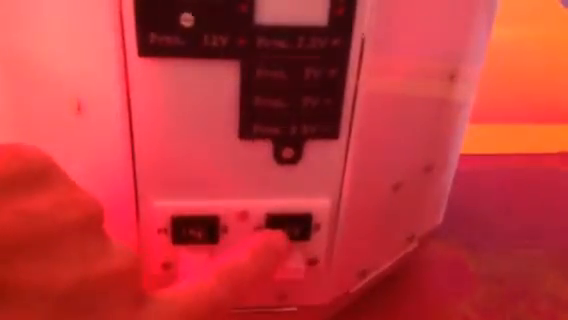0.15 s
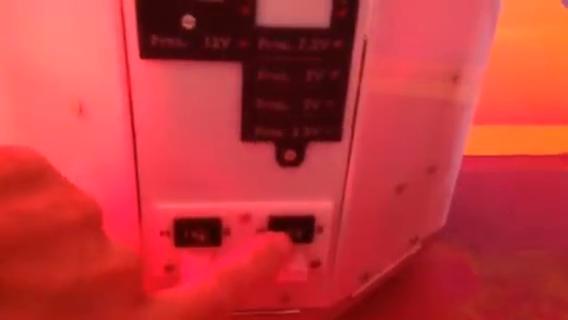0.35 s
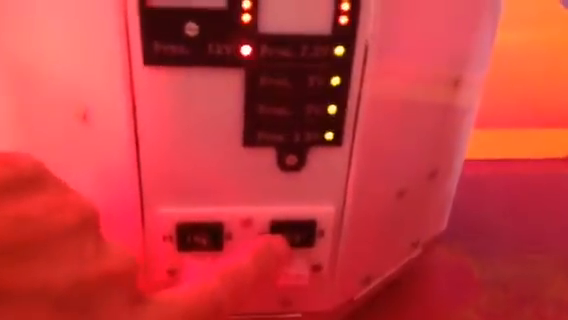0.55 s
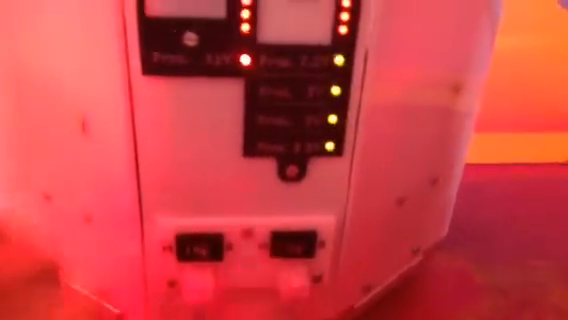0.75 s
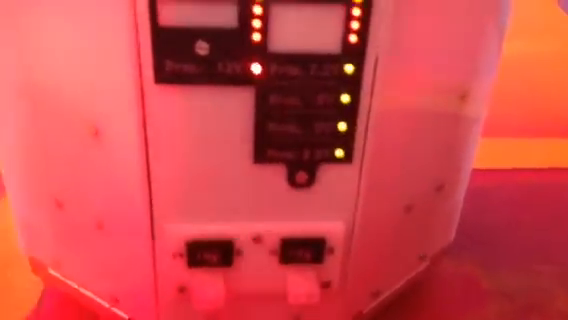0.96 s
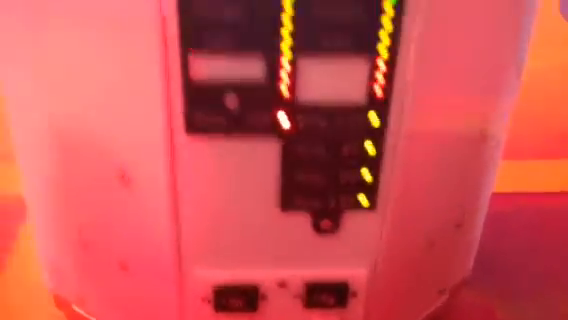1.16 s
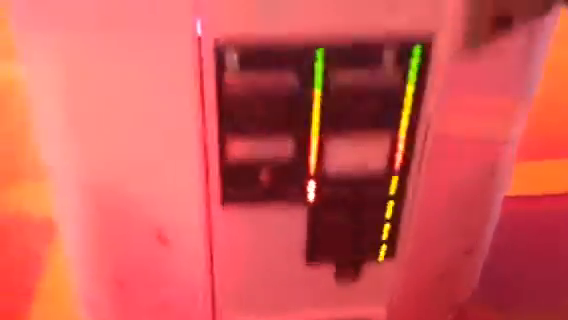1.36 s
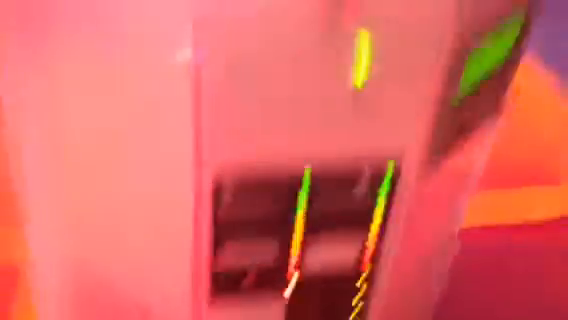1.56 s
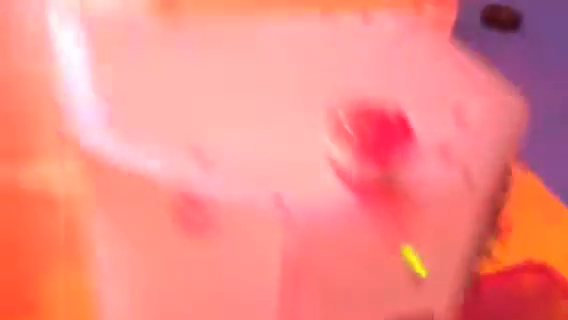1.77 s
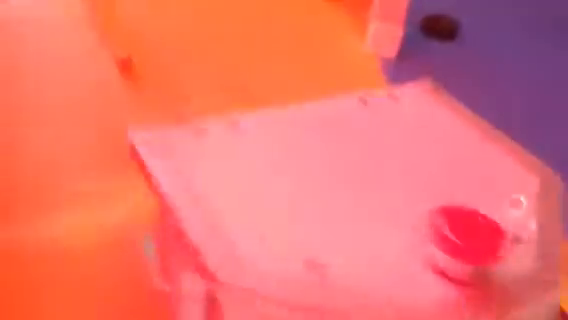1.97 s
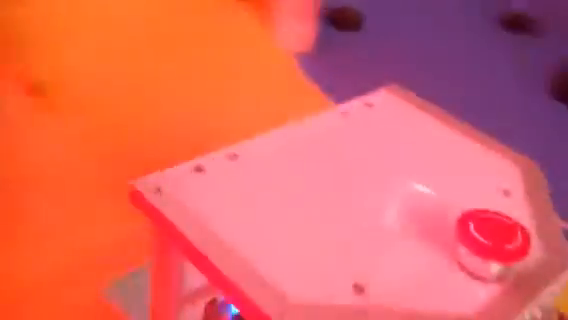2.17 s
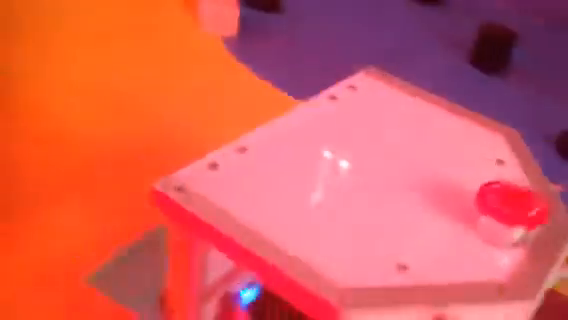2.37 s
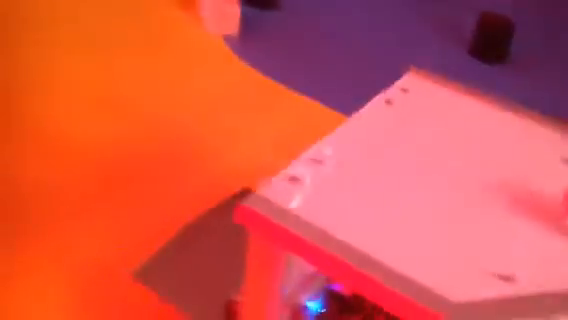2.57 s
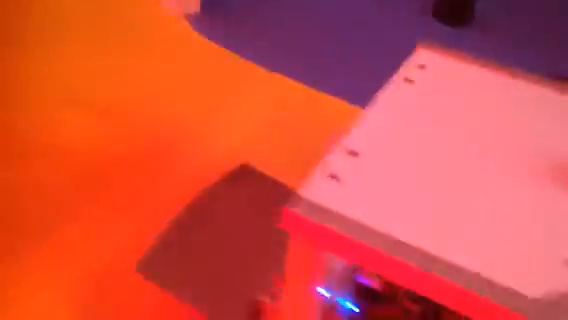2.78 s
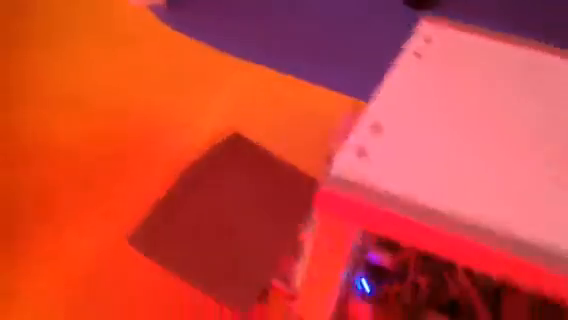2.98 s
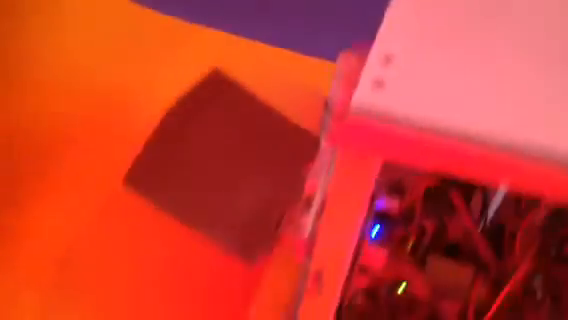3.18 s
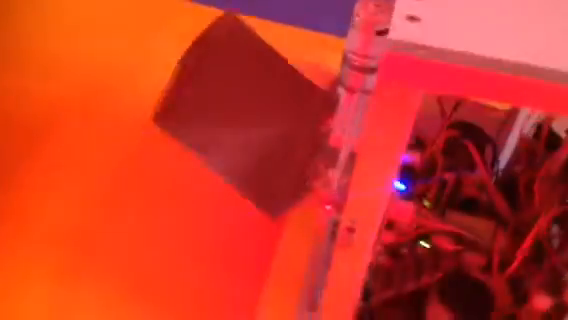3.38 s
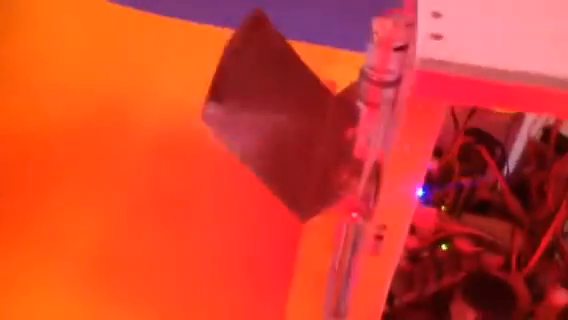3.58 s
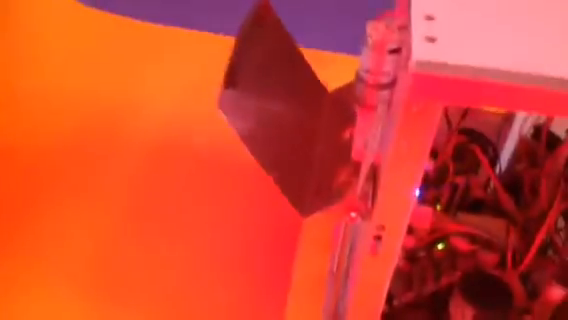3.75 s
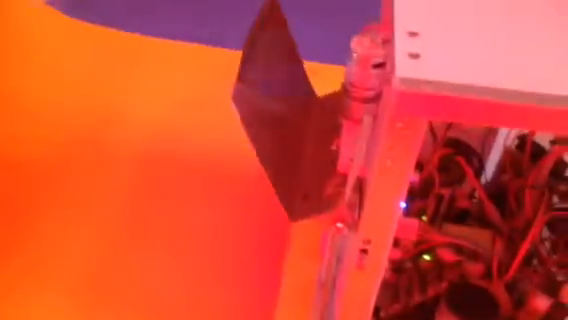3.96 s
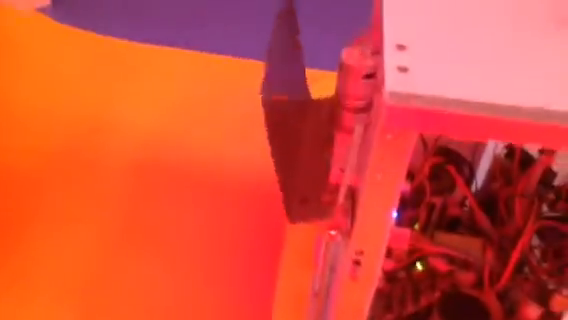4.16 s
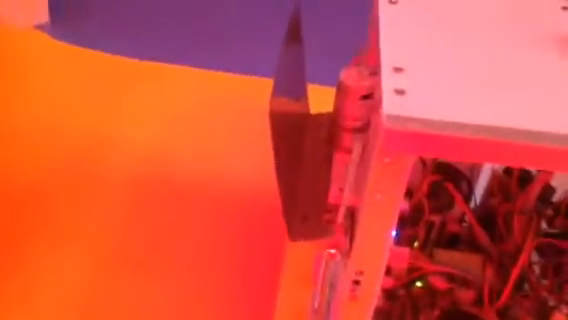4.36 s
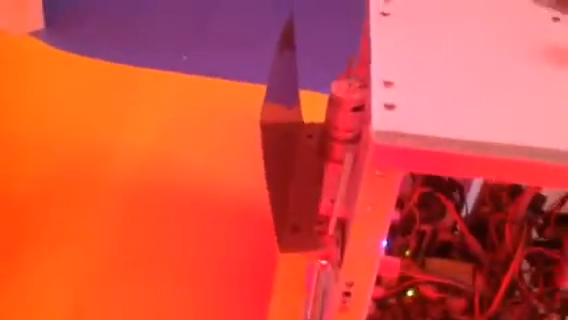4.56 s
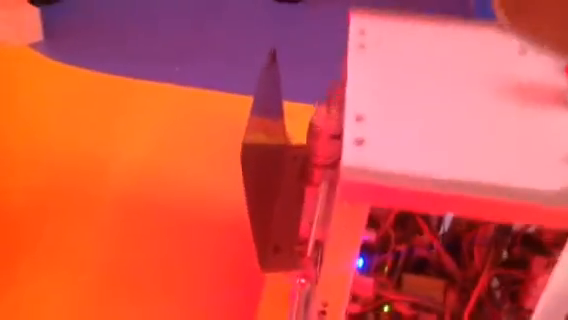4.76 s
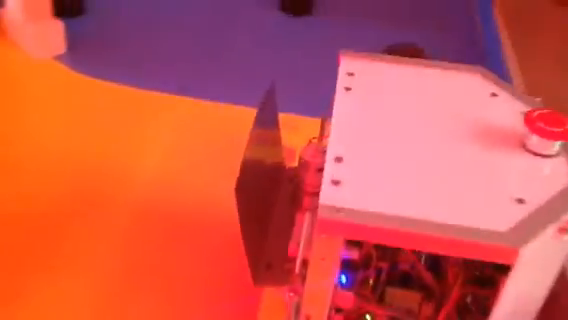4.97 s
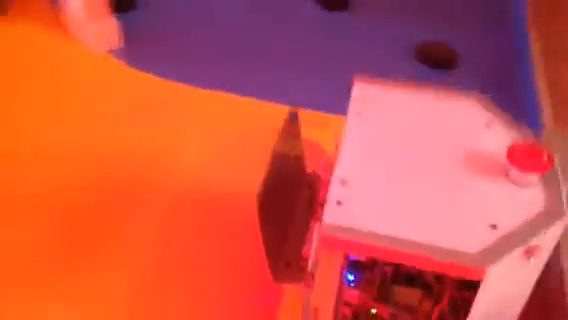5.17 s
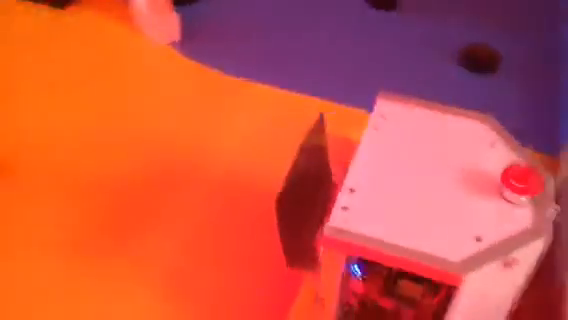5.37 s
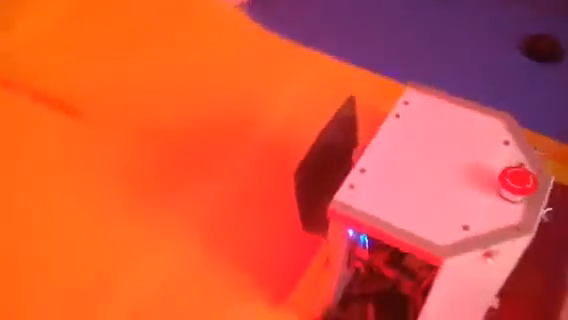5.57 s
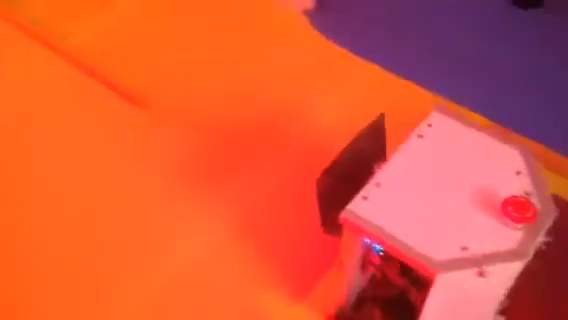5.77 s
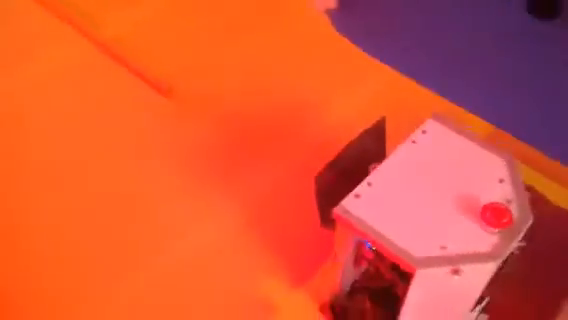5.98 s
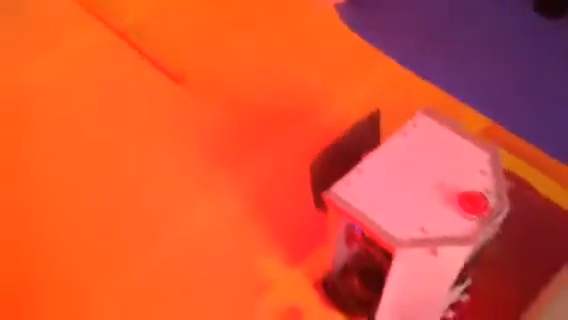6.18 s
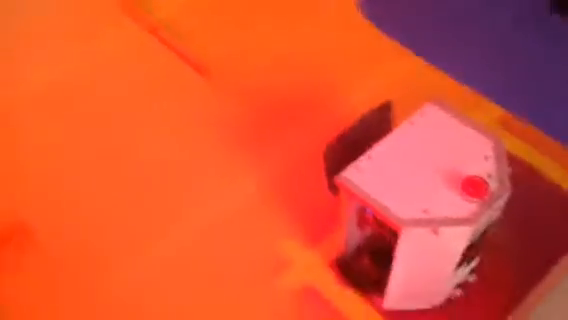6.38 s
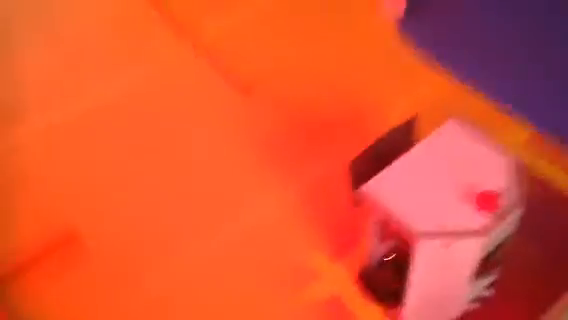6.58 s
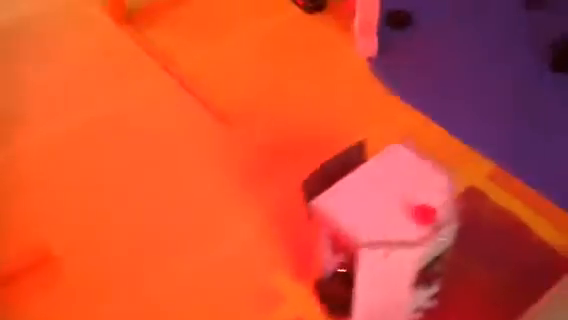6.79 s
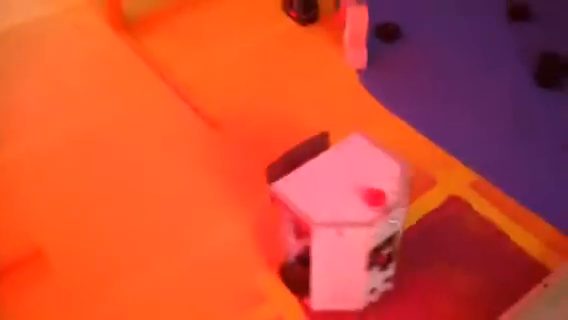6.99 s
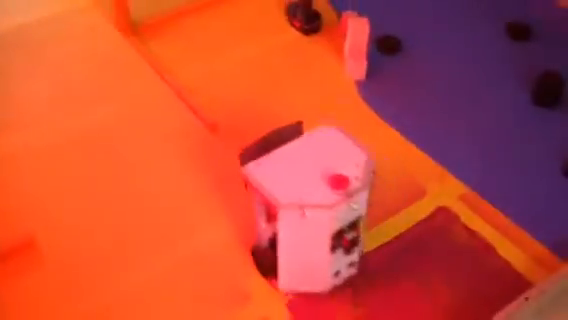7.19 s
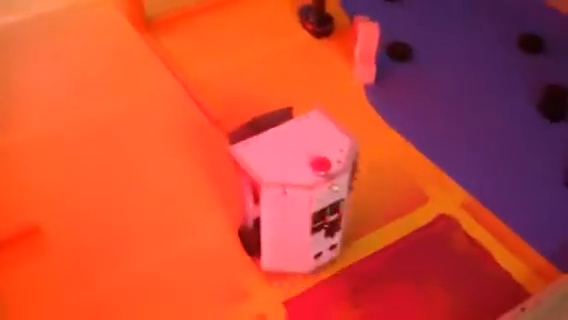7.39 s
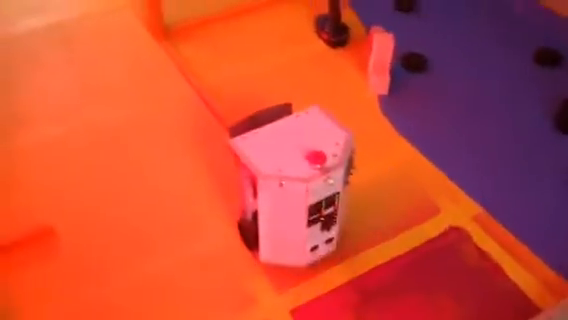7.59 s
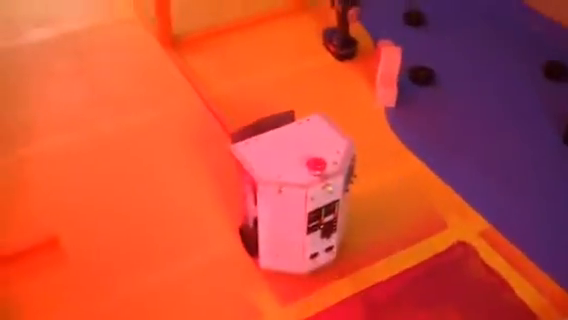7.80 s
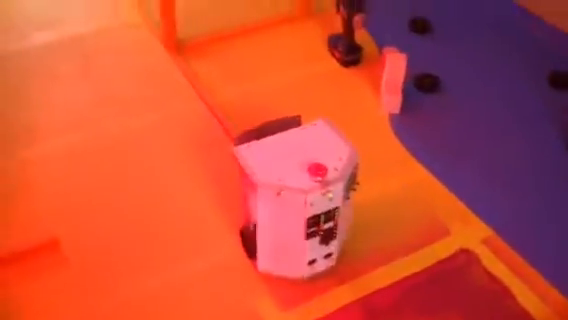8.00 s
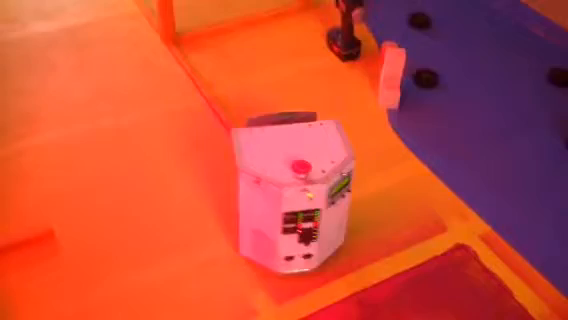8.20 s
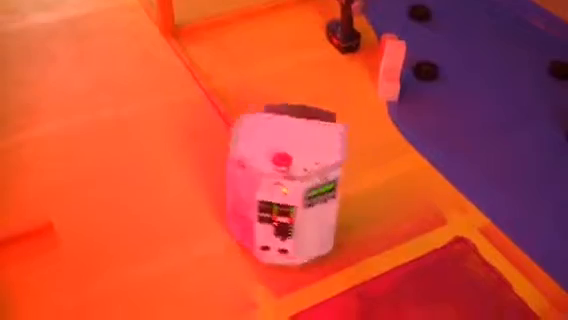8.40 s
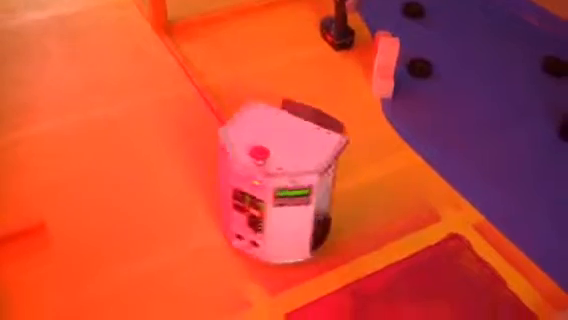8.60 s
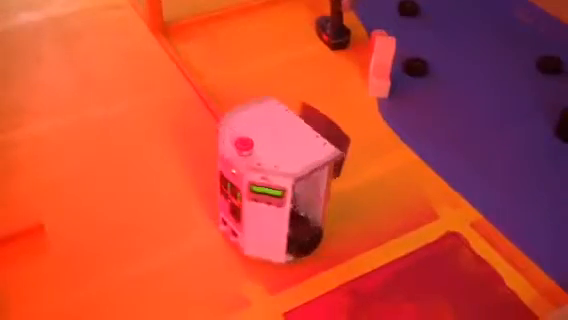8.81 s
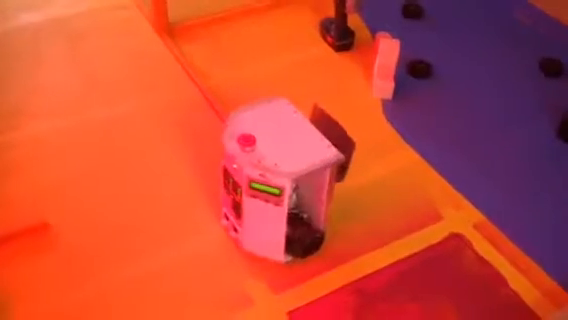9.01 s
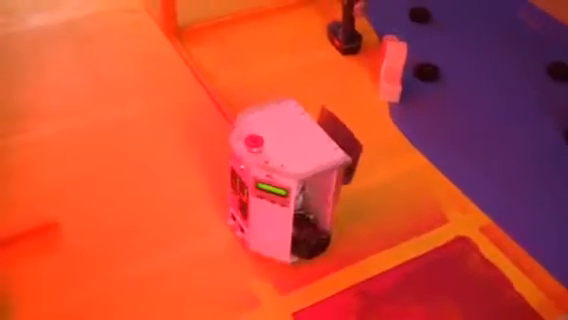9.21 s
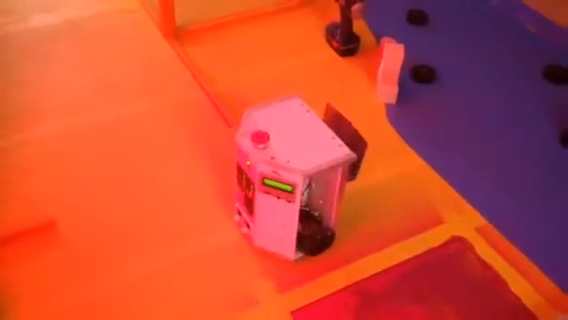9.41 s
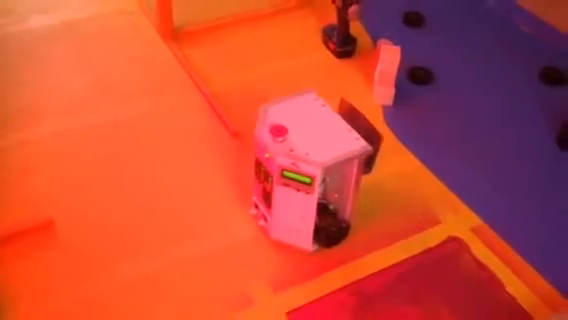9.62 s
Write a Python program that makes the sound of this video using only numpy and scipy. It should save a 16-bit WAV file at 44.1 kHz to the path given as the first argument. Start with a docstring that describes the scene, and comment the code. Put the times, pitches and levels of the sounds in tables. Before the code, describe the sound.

A switch snaps on a small robot, a geared servo whirs and scrapes with throbbing squeals, then wheel motors grind in short rumbling pushes.

```python
"""Faint hiss and one tiny tick, then a switch snaps on a small wheeled robot, close by in a quiet room.
A geared servo whirs while it lifts a flap: scraping noise and jittery tooth tones throb with each turn
of an uneven gear, and single teeth squeal. After a pause with faint shuffling the wheel motors turn the
robot in short pushes: noise and ringing modes rumble through the table under a thin chopper whine."""
import sys
import numpy as np
from scipy import signal
from scipy.fft import rfft, irfft
from scipy.io import wavfile
from scipy.ndimage import uniform_filter1d, map_coordinates

SR = 44100
rng = np.random.default_rng(int(sys.argv[2]) if len(sys.argv) > 2 else 0)


def file_out(sig):
    """Save sig as 16-bit WAV at sys.argv[1]."""
    # one column per channel
    cols = np.atleast_2d(sig).T
    # limit, then scale
    lim = np.clip(cols, -1, 1)
    pcm = np.round(lim * 32767).astype(np.int16)
    wavfile.write(sys.argv[1], SR, pcm)


N = 425565
T = np.arange(N) / SR  # s

# In all tables the levels are relative: later gains and mixing still apply.


def amp(db):
    """Decibels to a linear factor."""
    return 10 ** (np.asarray(db) / 20)


def evened(x):
    """Scales x to an RMS level of 1."""
    return x / np.sqrt(np.mean(x ** 2) + 1e-20)


def read(points, hz):
    """Value of a spectrum table at hz, interpolated along log frequency."""
    f, value = np.transpose(points)
    return np.interp(np.log(hz + 1), np.log(f + 1), value)


def play(rows):
    """A switch that is on between the ends of a curve table, then its columns at every sample."""
    s, *columns = np.transpose(rows)
    inside = 1. * ((T >= s[0]) & (T <= s[-1]))
    on = uniform_filter1d(inside, size=200, mode="nearest")
    return [on] + [np.interp(T, s, c) for c in columns]


def coloured(x, points):
    """Filters x by a spectrum table and evens it to level 1."""
    gain = amp(read(points, np.fft.rfftfreq(N, 1 / SR)))
    return evened(irfft(rfft(x) * gain, N))


def whistle(hz, width, firm=0.0082, locked=0):
    """Noise in a resonance that follows the curve hz; firm (0-1) evens its level into a jittery tone,
    locked adds a part that keeps step with the curve's own cycles."""
    r = np.exp(-np.pi * abs(width) / SR)
    noise = rng.standard_normal(N) + 1j * rng.standard_normal(N)
    slow = signal.lfilter([1], [1, -2 * r, r * r], noise)
    slow = slow / abs(slow) ** np.clip(firm, 0, 1)
    slow = slow / np.sqrt(np.mean(abs(slow) ** 2)) + locked
    carrier = np.exp(2j * np.pi * np.cumsum(hz * np.ones(N)) / SR)
    return evened((slow * carrier).real)


def wander(per_s):
    """Smooth random drift of level 1 with per_s random points a second."""
    knots = rng.standard_normal(4000)
    return evened(map_coordinates(knots, [T * per_s + 2], order=3))


def grit(per_s, spread_db):
    """Sparse clicks of uneven size and random sign, level 1."""
    size = amp(spread_db * np.minimum(rng.exponential(1, N), 5)) * rng.choice([-1, 1], N)
    return evened(size * (rng.random(N) < per_s / SR))


def patchy(x, db, bins, frames):
    """Random patches of pitch and time stand out, as parts chatter each on their own."""
    z = signal.stft(x, nperseg=512)[2]
    field = uniform_filter1d(rng.standard_normal(z.shape), bins, 0)
    field = uniform_filter1d(field, frames, 1)
    return evened(signal.istft(z * amp(db * evened(field)), nperseg=512)[1][:N])


def add(mix, s, sound):
    """Adds sound into mix from s seconds on."""
    part = mix[round(s * SR):][:len(sound)]
    part += sound[:len(part)]


def room(x):
    """Reverberation: sparse taps of random sign, each band dying at its own speed."""
    # decay of the room: hz, t60_s
    decay = [(200, 0.58), (1000, 0.7), (4000, 0.41), (12000, 0.23)]
    taps = np.zeros(SR)
    at = np.arange(200, SR - 20, 20)
    taps[at + rng.integers(0, 20, len(at))] = rng.choice([-1., 1.], len(at))
    hz, t, z = signal.stft(taps, SR, nperseg=256)
    tail = signal.istft(z * amp(-60 * t / read(decay, hz)[:, None]), SR, nperseg=256)[1]
    return signal.fftconvolve(x, tail / np.linalg.norm(tail))[:N]


def quiet():
    """Steady room and microphone hiss, faint resonant tones, and grit and a low moan in the pause."""
    # hiss spectrum: hz, density_db (per Hz)
    hiss = [(15, -47), (25, -5), (183, -4), (220, -2.5), (259, -4), (456, -7), (700, -12.5), (5550, -15.5),
            (15400, -19.5)]
    # faint tones: hz, width_hz, level_db
    faint = [(74, 3.5, -69.5), (1740, 180, -74.5), (312, 71, -76.5), (626, 90, -77), (9464, 6.1, -83.5),
             (4350, 560, -75.5)]
    # when each faint tone is heard: start_s, end_s
    spans = [(0, 1.9), (0, .56), (0, .56), (0, .56), (4.4, 5.4), (4.75, 5.2)]
    # faint shuffling: time_s, rustle_db, moan_db, moan_hz
    shuffle = [(4.7, -87, -66.5, 278.4), (5.36, -75, -83, 253), (5.48, -63.5, -64.5, 234),
               (5.65, -68, -69, 260), (6.1, -64.5, -66, 261), (6.35, -71, -89, 236)]
    out = amp(-64.15) * coloured(rng.standard_normal(N), hiss)
    for (hz, width, db), (start, end) in zip(faint, spans):
        fade = np.clip((end - T) / 0.15, 0, 1)
        out += amp(db) * whistle(hz, width, firm=0.5) * fade * (T >= start)
    on, rustle_db, moan_db, moan_hz = play(shuffle)
    rustle = coloured(grit(2500, 1.1), [(300, -6), (1500, -0.5), (4000, -2.5), (12000, -13.0)])
    moan = whistle(moan_hz, 68)
    return out + on * (amp(rustle_db + 2.0) * rustle + amp(moan_db - 2.5) * moan)


def frame():
    """The chassis hums with the servo: low shaking and one soft resonance of moving pitch."""
    # chassis: time_s, shake_db, hum_db, hum_hz
    hums = [(.65, -86, -54, 259), (1.5, -64, -52.5, 246), (1.75, -68, -53, 197.6),
            (3.0, -56.5, -55.5, 203.4), (4.2, -60, -60.5, 217.9), (4.33, -60.5, -48, 212.4),
            (4.5, -77, -67, 213.4)]
    on, shake_db, hum_db, hum_hz = play(hums)
    shake, hum = whistle(100, 56), whistle(hum_hz, 84)
    return on * (amp(shake_db - 2.0) * shake + amp(hum_db - 2.0) * hum)


def ticks():
    """Small ticks of relay, gears and chassis: each a dull puff of noise and one brief ring."""
    # ticks: start_s, level_db, pitch_hz
    tick_rows = [(.3227, -58, 4500), (0.6287, -31, 2350), (5.5293, -51, 1860), (5.6491, -51, 2520),
                 (6.607, -54, 2300), (6.657, -47, 563), (6.7605, -41, 2900), (7.928, -41, 3100),
                 (7.9985, -49, 3170), (8.198, -44, 1600), (9.0585, -53, 2800), (9.095, -52, 2780),
                 (9.1731, -49, 2720), (9.2818, -48, 2800), (9.33, -52, 560)]
    out, t = np.zeros(N), T[:3000]
    for s, db, hz in tick_rows:
        band = signal.butter(2, (.55 * hz, 1.7 * hz), "band", fs=SR, output="sos")
        puff = signal.sosfilt(band, rng.standard_normal(len(t)))
        puff *= amp(-60 * t / 0.03) * np.sqrt(3500 / hz)  # evens out the narrower low bands
        ring = amp(-60 * t / 0.016) * np.sin(2 * np.pi * hz * t)
        add(out, s, amp(db) * (1.3 * puff + 1.1 * ring))
    return out


def switch():
    """Pre-travel tick and snap: a sharp noise crack and the short modes of the plastic rocker."""
    # tick and snap: start_s, level_db, body_db (ringing body against the crack)
    snaps = [(.5345, -45, -14), (.5577, -4.5, -13)]
    # rocker modes: hz, level_db, t60_s
    modes = [(250, -19.5, 0.04), (560, -4, 0.022), (930, -14, 0.02), (1207, -12, 0.02), (2000, -8.5, 0.014),
             (2760, -5, 0.013), (3170, 4, 0.011), (4080, 0, 0.012), (5180, 0, 0.01), (6720, 9, 0.006),
             (10300, -5, 0.006)]
    out, t = np.zeros(N), T[:4000]
    rise = 1 - np.exp(-(t / .0003) ** 2)
    for s, db, body_db in snaps:
        # main burst, a still shorter spike, and a weak longer tail
        decay = amp(-60 * t / .010) + amp(6 - 60 * (t - .0003) / .002) + amp(-27 - 60 * t / .07)
        crack = signal.lfilter([1, -1], [1, -.6], rng.standard_normal(len(t))) * decay
        ring = sum(amp(d - 60 * t / t60) * np.sin(2 * np.pi * hz * t) for hz, d, t60 in modes)
        add(out, s, amp(db) * rise * (.4 * crack + amp(body_db) * ring))
    return out


def pushes():
    """Levels of rumble, upper table mode, gears and howl follow wheel speed: speed up, hold, brake."""
    # wheel pushes: start_s, full_speed_s, brake_s, stop_s, rumble_db, gear_db,
    # upper_db (upper table mode over the rumble), howl_db (gearbox howl over the gears)
    push_rows = [(6.569, 6.901, 7.58, 8.25, -46.5, -37.5, -3, -18),
                 (8.034, 8.218, 8.89, 9.54, -49.5, -45, -17, -5),
                 (9.307, 9.625, 9.9, 10.3, -44, -37, -4, -16)]
    rumble_range_db, upper_range_db, gear_range_db = 40.5, 25.5, 29  # loss at standstill
    rumble_curve = 1.7  # the rumble holds up longer
    brake_curve = 0.55  # braking takes most of the sound away at first
    rumble, upper, gear, howl = np.zeros((4, N))
    for start, full, brake, stop, rumble_db, gear_db, upper_db, howl_db in push_rows:
        slack = 1 - np.interp(T, (start, full, brake, stop), (0, 1, 1, 0))  # 0 at full speed
        moving = slack < 1
        slack = np.where(T > brake, slack ** brake_curve, slack)
        rumble += moving * amp(rumble_db - rumble_range_db * slack ** rumble_curve)
        upper += moving * amp(rumble_db + upper_db - upper_range_db * slack)
        gear += moving * amp(gear_db - gear_range_db * slack)
        howl_in = np.interp(T, (full, full + .14), (.1, 1))
        howl += moving * amp(gear_db + howl_db - 2 * gear_range_db * slack) * howl_in
    return rumble, upper, gear, howl


def jolts():
    """Each tyre bump swells fast and rings out; levels for the table and for its upper mode."""
    # jolts: start_s, level_db, upper_db (upper mode over the level)
    bump_rows = [(6.67, -61, 10.5), (6.836, -46, 6), (6.967, -33, -3), (7.132, -40.5, 8), (7.226, -36, 3.5),
                 (7.334, -32.5, -5), (7.44, -30, -21), (7.569, -27.5, -16), (7.64, -31.5, -33),
                 (7.7, -38.5, -30), (7.753, -44.5, -20), (7.924, -40, -32.5), (8.2, -47, -23),
                 (8.341, -36, -20), (8.435, -37, -25.5), (8.608, -34.5, -29.5), (8.802, -41, -27),
                 (8.87, -55.5, -30.5), (9.5, -39.5, -14), (9.56, -53, -8)]
    rise_s, t60_s = 0.013, 0.29
    low, upper, t = np.zeros(N), np.zeros(N), T[:SR // 2]
    shape = np.minimum(t / rise_s, 1) * amp(-60 * t / t60_s)
    for s, db, upper_db in bump_rows:
        add(low, s, amp(db) * shape)
        add(upper, s, amp(db + upper_db) * shape)
    return low, upper


def wheels():
    """Tyre bumps ring the table, gears grind, and the current chopper sings on fixed pitches."""
    # broad wash of the table: hz, density_db (per Hz)
    wash = [(30, -19), (70, -20), (110, -35), (200, -2.5), (330, -12.5), (430, -12), (700, -44),
            (1200, -60)]
    # table modes: hz, width_hz, level_db
    table_modes = [(83, 29, -8.5), (150.1, 33.4, 4), (415, 14, -14.5)]
    # wheel gear noise: hz, density_db (per Hz)
    gear_spectrum = [(260, -25), (450, -5), (712, -5), (985, -4), (1360, -4.5), (2000, -2), (2940, -7),
                     (3730, -6.5), (5160, -17), (6340, -19.5), (7800, -27.5), (12700, -36), (15400, -45)]
    # wheel gearbox resonances: hz, width_hz, level_db
    gear_rings = [(948, 67, -16), (3665, 240, -16.5), (562, 150, -12.5)]
    # chopper harmonics: multiple, level_db
    chopper = [(2, -8), (3, -3), (4, -4), (5, -10), (9, -15)]
    chopper_on_s, chopper_hz = 6.605, 490
    onset_db, onset_s = 8, 0.11  # the whine is loudest at its onset, then settles
    upper_mode, jolt_mode, howl_mode = (272, 83), (148, 24.7), (1960, 170)  # hz, width_hz
    (rumble, steady_upper, gear, howl), (jolt, jolt_upper) = pushes(), jolts()

    bumps = coloured(0.61 * grit(400, 1.9) + rng.standard_normal(N), wash)
    bumps += sum(amp(db + 0.85 * wander(22)) * whistle(hz, width, firm=0.039)
                 for hz, width, db in table_modes)
    upper = whistle(*upper_mode, firm=0.37) * (steady_upper + jolt_upper)
    jolt_ring = amp(-10.5) * bumps + whistle(*jolt_mode, firm=0.49)
    table = amp(0.58 * wander(35)) * (rumble * bumps + upper) + jolt * jolt_ring

    grind = patchy(rng.standard_normal(N) + 0.4 * grit(900, 4.5), db=2.3, bins=3, frames=3)
    grind = coloured(grind, gear_spectrum)
    grind += sum(amp(db + 2.3 * wander(20)) * whistle(hz, width) for hz, width, db in gear_rings)
    # sparse bright specks: clicks stretched into short bursts of noise
    specks = signal.lfilter([1], [1, -.97], grit(25, 2.0)) * rng.standard_normal(N) / 4
    treble = signal.butter(4, 7500, "high", fs=SR, output="sos")
    crackle = amp(-27.0) * signal.sosfilt(treble, specks)
    howling = howl * amp(2.5 * wander(30)) * whistle(*howl_mode, firm=0.1)
    gears = gear * crackle + howling + (amp(-3.0) * gear + amp(-20) * jolt) * grind

    whine = sum(amp(db + 3 * wander(18)) * whistle(k * chopper_hz, 45) for k, db in chopper)
    whine_level = amp(-46.5) * (gear + amp(-83.0)) ** 0.37  # grows only a little as the gears get louder
    on = np.clip((T - chopper_on_s) / .01, 0, 1)
    on = on * amp(onset_db * np.clip(2 - 2 * (T - chopper_on_s) / onset_s, 0, 1))
    return table + gears + on * whine_level * whine


def squeals():
    """Where a tooth catches, one tooth tone flares: a slightly unsteady sine, fast up and soon gone."""
    # squeals: start_s, level_db, pitch_hz
    squeal_rows = [(1.263, -25, 2230), (1.513, -25, 2326), (1.572, -26, 2326), (1.63, -27, 2354),
                   (1.631, -29, 3780), (1.812, -28.5, 3040), (1.87, -28, 3050), (1.932, -25.5, 3056),
                   (1.964, -27.5, 2290), (2.083, -28, 3774), (2.143, -28.5, 3690), (2.26, -32, 3680),
                   (2.319, -26.5, 2880), (2.321, -25, 3660), (2.393, -30, 1970), (3.411, -27, 2130),
                   (3.531, -31, 2110), (3.607, -29, 2170), (3.72, -28.5, 2080), (3.82, -26.5, 2120)]
    rise_s, t60_s = 0.0017, 0.053
    out, t = np.zeros(N), T[:4000]
    shape = (1 - np.exp(-(t / rise_s) ** 2)) * amp(-60 * t / t60_s)
    for s, db, hz in squeal_rows:
        drift = .02 * np.cumsum(rng.standard_normal(len(t)))  # radians
        add(out, s, amp(db + 3) * shape * np.sin(2 * np.pi * hz * t + drift))
    return out


def servo():
    """Scraping teeth and their jittery tones, all swelling where the uneven gear binds."""
    # mean tooth rate, sagging under the load of the flap: time_s, teeth_hz
    tooth_rate = [(.63, 675), (.72, 733), (1.48, 732), (1.55, 767), (2.3, 766), (2.35, 684), (2.45, 655),
                  (2.8, 640), (3.1, 594.5), (3.4, 535.5), (3.85, 526), (4.0, 546), (4.13, 578), (4.19, 628),
                  (4.3, 655), (4.37, 661)]
    # flap servo: time_s, noise_db, treble_db (over the noise), tone_db (tooth tones over the noise)
    levels = [(.64, -41, -14, 0), (.68, -35, -9, -1.5), (1.15, -30, -10.5, -2.5), (1.58, -31, -8.5, -3),
              (1.75, -35.5, -8.5, -1.5), (2.28, -33.5, -6, -2), (2.34, -34.5, -3, 4.5),
              (2.6, -32.5, -4.5, 2.5), (3.1, -30.5, -6, -4.5), (3.9, -30.5, -6.5, -2), (4.15, -32, -1, 6),
              (4.375, -32, -2, 3)]
    # depth of the throb: time_s, once_a_turn_db, twice_a_turn_db
    throb = [(.64, 2.5, 3), (1.2, 5, 0), (1.5, 5, 0), (1.75, -1.3, 3.5), (2.28, 3.5, 2), (2.45, 1, 1),
             (2.9, 0.5, 0.85), (3.9, -0.5, 0.9), (4.37, 1.5, 1.5)]
    # servo case and treble of the gears: hz, density_db (per Hz)
    case_spectrum = [(50, -29), (240, -20), (400, -17.5), (587, -5.5), (677, -18.5), (914, -3), (1040, -7),
                     (1490, -5.5), (1790, -8), (2240, 0.5), (2500, -4), (3710, -2.5), (7000, -23.5),
                     (15400, -82)]
    fizz = [(3240, -28.5), (5500, -5), (6290, -7), (9220, -9), (11900, -12), (15400, -16)]
    # resonances heard most while the panel faces us, and those always heard: hz, width_hz, level_db
    early_rings = [(5430, 130, -18), (9100, 490, -16), (4400, 360, -24)]
    case_rings = [(3667, 110, -15), (5380, 150, -19), (7330, 130, -22)]
    # how the case passes tooth tones: hz, level_db
    tone_case = [(500, -37.5), (760, -4), (1050, -11), (1400, -2.5), (1640, -5.5), (1810, -10), (1970, -2),
                 (2250, -2.5), (2560, -4.5), (3000, -11.5), (3700, -6), (4600, -7), (5350, -8), (6500, -73)]
    # tooth tones: multiple, width_hz, lead_rad (over the bind), share (of the throb)
    tone_rows = [(1, 59, 0.99, 0.52), (2, 77, 1.5, 0.33), (3, 45, 0.55, 0.77), (4, 124, 0.67, 1.7),
                 (5, 69, 0.37, 0.58), (6, 190, .1, 1), (7, 85, .1, 1.52), (8, 200, .1, 1.75)]
    panel_turns_away = (1, 1.66)  # s
    teeth_per_turn, first_bind_s = 46, .663  # the uneven gear binds hardest once a turn
    heavy_s = (2.3, 2.4, 4.0, 4.5)  # the load grows, holds and eases: tones roughen
    half_lag = 1.28  # radians by which the twice-a-turn throb trails

    on, db, treble_db, tone_db = play(levels)
    throb_db, half_db = play(throb)[1:]
    mean_hz = play(tooth_rate)[1]
    teeth = np.cumsum(mean_hz) / SR
    turn = 2 * np.pi * (teeth - teeth[round(first_bind_s * SR)]) / teeth_per_turn
    bind_db = throb_db * np.cos(turn) + half_db * np.cos(2 * turn - half_lag)
    loaded = np.interp(T, heavy_s, (0, 1, 1, 0))
    jitter = np.interp(mean_hz, (530, 680, 730), (.016, .013, .011))  # slow gears run less evenly
    teeth_hz = mean_hz * (1 + jitter * wander(30) + .011 * loaded * wander(150))

    tooth = 1 + 0.19 * np.cos(2 * np.pi * np.cumsum(teeth_hz) / SR)  # each tooth gates the scrape
    rough = rng.standard_normal(N) + 0.52 * grit(2200, 2.7)
    scrape = patchy(tooth * rough, db=2.8, bins=3, frames=3)
    case = coloured(scrape, case_spectrum)
    low = signal.sosfiltfilt(signal.butter(2, 2400, fs=SR, output="sos"), case)
    high = case - low + amp(treble_db) * coloured(scrape, fizz)
    facing = np.interp(T, panel_turns_away, (1, .2))
    high += facing * amp(1.4 * bind_db) * sum(amp(level_db) * whistle(hz, width)
                                              for hz, width, level_db in early_rings)
    high += sum(amp(level_db + 2.2 * wander(25)) * whistle(hz, width)
                for hz, width, level_db in case_rings)
    noise = amp(bind_db) * high + amp(0.49 * bind_db) * low  # the heavy case smooths the low throb

    tones = 0
    half_sing_db = 1.66 * (half_db + 0.32) * np.cos(2 * turn - half_lag + 0.11)
    for k, width, lead, share in tone_rows:
        sing_db = share * (throb_db + 3.0) * np.cos(turn + lead) + half_sing_db
        flutter_db = (2.2 + 1.4 * loaded) * wander(40)
        in_step = 1.2 * (k > 1) * (T < heavy_s[0])  # tones in step make crisp tooth strikes
        ring = whistle(k * teeth_hz, width, firm=0.79, locked=in_step)
        tones += amp(read(tone_case, k * teeth_hz) + sing_db + flutter_db) * ring
    return on * amp(db) * (amp(-5.5) * noise + amp(tone_db - 12.5) * tones)


def scene():
    """All sources at the microphone, with the room's answer to servo, switch, wheels and ticks."""
    near, knocks, far = servo() + squeals(), switch(), wheels() + ticks()
    wet = room(amp(-11.0) * near + amp(-16.5) * knocks + amp(-9.5) * far)
    return (near + knocks + far + wet + frame() + quiet())[None]


def record(dry):
    """The small microphone loses the deep bass; then the band limit of the recorder."""
    mic_low_hz, edge_hz = 46, 15300
    thin = signal.sosfilt(signal.butter(3, mic_low_hz, "high", fs=SR, output="sos"), dry)
    band_limit = signal.firwin(511, edge_hz, window=("kaiser", 9), fs=SR)
    return signal.oaconvolve(thin, band_limit[None], "same")


dry = scene()
out = record(dry)
file_out(out)
```